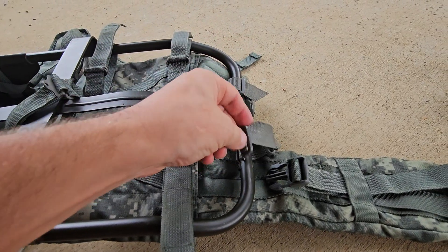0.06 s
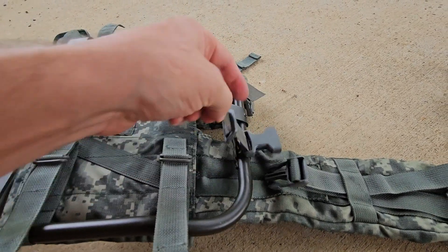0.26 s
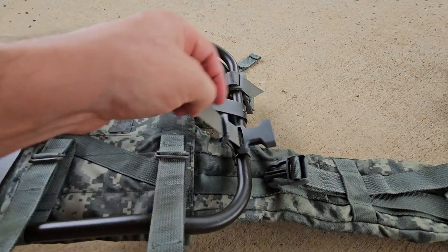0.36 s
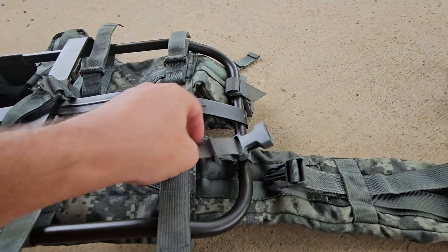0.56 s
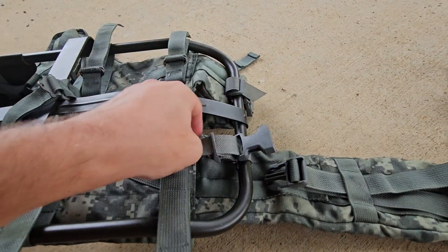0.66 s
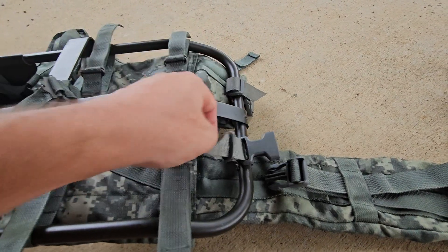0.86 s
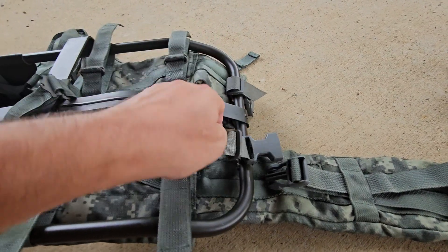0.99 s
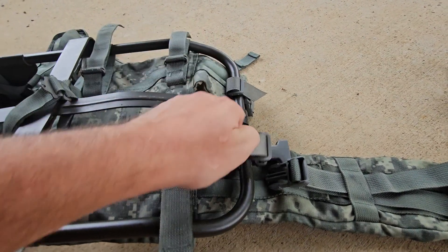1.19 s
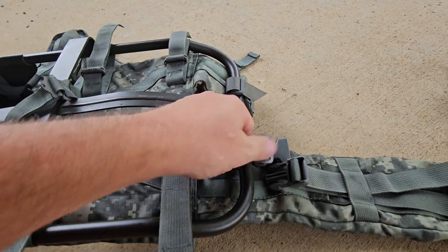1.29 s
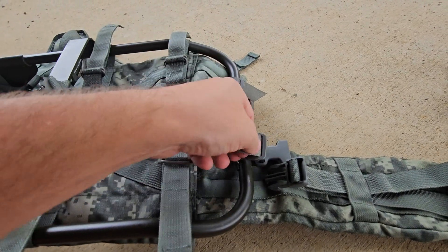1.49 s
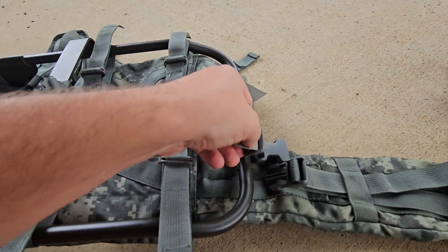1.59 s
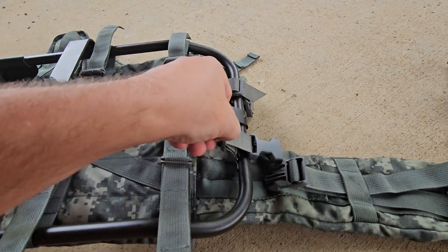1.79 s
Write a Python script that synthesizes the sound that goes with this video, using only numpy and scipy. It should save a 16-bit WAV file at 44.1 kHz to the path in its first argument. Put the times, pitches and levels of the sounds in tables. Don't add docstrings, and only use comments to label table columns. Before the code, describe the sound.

A plastic buckle on a webbing strap clacks loudly in a quick burst near the start, followed by dull frame knocks, fabric scuffs, softer clicks and a last small rattle, close-miked in a quiet room.

```python
import sys
import numpy as np
from scipy import signal
from scipy.fft import rfft, irfft, next_fast_len
from scipy.io import wavfile
from scipy.ndimage import uniform_filter1d

SR = 44100
rng = np.random.default_rng(int(sys.argv[2]) if len(sys.argv) > 2 else 0)


def bounce(signal):
    frames = np.transpose(np.atleast_2d(signal))
    limited = np.clip(frames, -1, 1)
    pcm = np.round(limited * 32767).astype(np.int16)
    wavfile.write(sys.argv[1], SR, pcm)


def how_loud(loudness_db):
    steps = np.asarray(loudness_db, float) / 20
    return 10 ** steps


N = 81585


def shape(x, gain):
    n = next_fast_len(x.shape[-1] + 2048)
    hz = np.arange(n // 2 + 1) * SR / n + 1e-3
    return irfft(rfft(x, n) * gain(hz), n)[..., :x.shape[-1]]


def curve(points):
    p = np.array(points)
    return lambda hz: how_loud(np.interp(np.log(hz), np.log(p[:, 0]), p[:, 1]))


def level(x, db):
    return x * how_loud(db) / np.sqrt(np.mean(x ** 2))


def walk(rate_hz):
    hold = int(SR / rate_hz)
    values = rng.standard_normal(N // 40)[:N // hold + 1]
    return uniform_filter1d(np.repeat(values, hold)[:N], hold)


def noise(apart, size=N):
    z = rng.standard_normal((3, size))
    return np.sqrt(1 - apart) * z[0] + np.sqrt(apart) * z[1:]


def add(out, start_s, sound):
    # time_s, left_over_right_db
    hand_side = [(0, -1.5), (.21, -1), (.3, -1), (.7, -4.5), (.89, 0), (1.1, -2.5), (1.7, -5), (1.82, 2)]
    i = int(start_s * SR)
    n = min(sound.shape[-1], N - i)
    pan_db = np.interp(start_s, *np.array(hand_side).T)
    sides = how_loud(np.array([[pan_db], [-pan_db]]) / 2)
    out[:, i:i + n] += (sound * sides)[:, :n]


def ring(t, hz, t60_s, rise_s, lead=0):
    caught_s = 0.022
    t = np.maximum(t, 0)
    fade = np.exp(-np.log(1000) * t / t60_s - (t / caught_s) ** 3)
    return np.sin(2 * np.pi * hz * t + lead) * fade * (1 - np.exp(-t / rise_s))


def off_pitch(hz, best_hz, octaves):
    return 1 - np.exp(-(np.log2(hz / best_hz) / octaves) ** 2)


def buckle_contacts(rows, top_hz):
    # pitch_hz, level_db, t60_s, left_lead_rad
    modes = [(2210, -10, 0.059, 1.4), (2420, -7, 0.12, 0.33), (2550, 8.5, 0.021, 0.3),
             (2975, 0.5, 0.086, 1.6), (3340, 0, 0.053, 1.4), (3700, -8, 0.038, 1.5),
             (3860, -10, 0.039, 2.5), (5560, -3, 0.038, 1.56), (6350, -16.5, .025, 4.3),
             (7340, 5, 0.033, 0.56), (8040, 8.5, 0.032, 1), (11150, -8.5, 0.014, 1.7),
             (12000, 1.5, .02, 1.8), (13700, -1, 0.025, 2.2)]
    focus_oct, focus_db, scatter_db = 0.04, 15, 3
    grip = 0.55
    rattle_db, rattle_t60_s = -9.5, 0.099
    skirt_db, skirt_oct, low_hz = 6, 0.88, 925
    body_db, body_width = -4, 0.017
    out, t = np.zeros((2, N)), np.arange(4000) / SR
    for start_s, db, best_hz, scrape_ms, ring_db in rows:
        luck = rng.standard_normal((len(modes), 2))
        ringing = 0
        for (hz, mode_db, t60_s, lead), (drive, detune) in zip(modes, luck):
            off = off_pitch(hz, best_hz, focus_oct)
            strength = how_loud(mode_db + (scatter_db * drive - focus_db) * off)
            leads = np.array([[lead], [0]])
            tone = ring(t, hz * (1 + 0.00041 * detune), t60_s * (1 - grip * off), scrape_ms / 4000, leads)
            ringing = ringing + strength * tone

        def skirt(f):
            off = off_pitch(f, min(best_hz * 1.09, 8000), skirt_oct)
            return how_loud(-skirt_db * off) / (1 + (low_hz / f) ** 3)

        def body(f):
            peaks = sum(how_loud(4 * detune - 4) / (1 + ((f / mode[0] - 1) / body_width) ** 2)
                        for mode, detune in zip(modes, luck[:, 1]))
            return 0.8 + how_loud(body_db) * peaks

        u = t * 1000 / scrape_ms
        scrape = np.exp(-u ** 2) + how_loud(rattle_db - 60 * t / rattle_t60_s)
        crack = noise(1, size=4000) * np.minimum(u * 4, 1) * scrape
        crack = shape(shape(crack, skirt), body)
        add(out, start_s, (ringing * how_loud(ring_db) + crack) * how_loud(db))
    return shape(out, lambda hz: 1 / (1 + (hz / top_hz) ** 6))


def snaps():
    # start_s, crack_db, best_driven_hz, scrape_ms, ring_over_crack_db
    hard_snaps = [(0.2111, -21.5, 2210, 3.2, -4.5), (.212, -29, 7730, 2.5, 6), (.250, -31, 8500, 1.5, 1),
                  (0.2703, -20, 2420, 1.96, 8), (.2706, -22, 3700, 2.3, -11),
                  (0.2848, -17.5, 7220, 5.3, -10), (.289, -22, 2420, 12, -2.5), (.2935, -26, 5570, 5.1, 12),
                  (0.353, -28.5, 4000, 3.5, -6.5), (1.104, -39.5, 12000, 5.7, -8),
                  (1.1095, -43, 7340, 2.2, -15.5), (1.117, -55, 12000, 1.4, -3.5),
                  (1.1244, -37.5, 5570, 3.7, 5.5), (1.1255, -42.5, 2420, 2, -7.5),
                  (1.805, -38, 13400, 4.8, -10)]
    return buckle_contacts(hard_snaps, top_hz=19100)


def taps():
    # start_s, crack_db, best_driven_hz, scrape_ms, ring_over_crack_db
    soft_taps = [(.027, -44.5, 3550, 2.6, -1), (.105, -52.5, 3330, 2.3, -3), (.152, -48, 2480, 2.3, -12),
                 (.217, -36, 2975, 15, 9.5), (.510, -51, 4100, 2.9, -3), (.524, -38, 3500, 2.5, -14),
                 (.558, -49, 2220, 0.96, -18), (.625, -52, 2710, 2.4, -26), (.686, -61.5, 5560, 3, 2),
                 (.751, -56.5, 6500, 3, -7.5), (.799, -57, 2210, 4.9, 9), (.806, -51, 4900, 2.1, -1),
                 (.8885, -37, 3090, 3.8, -20), (.894, -32, 2630, 1.34, -23), (1.228, -65, 2975, 13, -3),
                 (1.734, -50, 2210, 4, 7.5), (1.8125, -34.5, 3340, 7.6, -0.5),
                 (1.8245, -37, 5540, 2.7, -12), (1.829, -44, 5570, 4.7, 8.5), (1.817, -45, 2210, 12, 16),
                 (1.824, -40.5, 2935, 16, -1)]
    return buckle_contacts(soft_taps, top_hz=7300)


def pings():
    # start_s, level_db, pitch_hz, t60_s
    loose_parts = [(0.211, -26, 2990, .02), (.2125, -28, 2210, 0.015), (.2112, -33, 4970, 0.036),
                   (0.211, -43, 4190, .05), (.213, -42.5, 1537, 0.094), (0.216, -47.5, 143, 0.35),
                   (0.2715, -17, 2850, 0.015), (0.2713, -25, 3270, .014), (.2706, -17.5, 3590, 0.02),
                   (0.2711, -22, 5280, .014), (.2712, -30.5, 7450, .035), (0.272, -33.5, 8260, .022),
                   (0.271, -34.5, 13440, .015), (0.2832, -26, 7750, .03), (0.284, -27.5, 10720, .025),
                   (0.289, -31, 7870, .025), (.352, -45, 722, 0.022), (.3527, -35, 2920, 0.032),
                   (.353, -40, 4230, 0.022), (.354, -39, 5500, 0.017), (.5237, -48, 1350, 0.013),
                   (.524, -45, 7300, .015), (.5583, -47, 2180, 0.0096), (.5585, -48, 3900, .012),
                   (0.8886, -39.5, 3010, .02), (.8888, -41.5, 5500, 0.038), (0.8898, -45, 4090, .04),
                   (0.8904, -44, 6490, .045), (.892, -44, 2570, 0.068), (0.892, -45.5, 3250, 0.065),
                   (.892, -57.5, 1723, .08), (.892, -57.5, 604, .06), (1.1042, -39.5, 6460, 0.013),
                   (1.110, -46, 7300, .016), (1.1046, -39.5, 12300, .02), (1.1095, -49, 12600, .015),
                   (1.109, -49, 2670, 0.022), (1.1255, -38.5, 7800, 0.012), (1.685, -62.5, 628, 0.061),
                   (1.8134, -32.5, 5580, 0.032), (1.805, -43, 13000, .015), (1.233, -52, 3140, 0.032),
                   (1.125, -39, 2455, 0.035), (1.812, -38.5, 3700, .03), (1.817, -38, 3110, .03)]
    rise_s, lead_rad = 0.0004, 1.5
    out, t = np.zeros((2, N)), np.arange(3000) / SR
    for start_s, db, hz, t60_s in loose_parts:
        leads = lead_rad * min(hz / 2000, 1) * np.array([[1], [0]])
        add(out, start_s, how_loud(db) * ring(t, hz, t60_s, rise_s, leads))
    return out


def knocks():
    # start_s, level_db, pitch_hz, t60_s
    frame_knocks = [(.213, -39, 714, 0.054), (0.217, -44, 288, 0.21), (.271, -35.5, 777, 0.03),
                    (0.286, -37, 1157, 0.043), (.490, -53.5, 737, 0.12), (0.5238, -31.5, 730, 0.009),
                    (0.591, -33.5, 744, 0.0059), (.614, -42, 744, 0.013), (0.804, -52, 466, 0.051),
                    (0.895, -55, 1220, 0.081), (1.125, -38, 764, 0.043), (1.203, -45, 670, 0.019),
                    (1.233, -55.5, 755, 0.04), (1.735, -50, 793, 0.044), (1.820, -51, 755, 0.14)]
    right_lag_s, left_db = 0.00008, 2.5
    out, t = np.zeros((2, N)), np.arange(3000) / SR - np.array([[0], [right_lag_s]])
    for start_s, db, hz, t60_s in frame_knocks:
        tone = ring(t, hz, t60_s, 0.00053)
        tone = tone + how_loud(-5) * ring(t, hz * 1.6, t60_s * 0.31, 0.00031)
        grit = noise(0.16, size=3000) * how_loud(-60 * abs(t) / t60_s)
        grit = shape(grit, lambda f: 3 / (1 + (f / hz / 1.04) ** 2) / (1 + (hz * 0.99 / f) ** 6))
        add(out, start_s, (tone + grit) * how_loud(db + left_db * np.array([[1], [-1]])))
    return out


def strap():
    # start_s, length_s, level_db, tilt_db_per_octave
    strokes = [(0, 0.23, -61, -2.5), (0.182, 0.044, -51, -1.5), (0.204, 0.065, -41, -3),
               (0.271, 0.056, -45.5, -3.5), (0.317, 0.14, -49.5, -0.5), (0.478, 0.11, -52.5, -2),
               (0.589, 0.064, -54, 0), (0.66, 0.056, -59, 3.5), (0.744, 0.027, -61, 1.5),
               (0.782, 0.056, -60.5, -2), (0.898, .08, -59, 0.5), (1.058, 0.059, -62, 2),
               (1.123, 0.036, -71, -7), (1.198, 0.081, -63.5, -4), (1.283, 0.072, -61, 1),
               (1.381, 0.043, -62, -0.5), (1.441, 0.053, -63.5, 5.5), (1.579, 0.046, -54.5, 5.5),
               (1.661, 0.1, -63, 3), (1.783, 0.076, -54.5, -3)]
    rise_s, rise_share, edge, low_hz = 0.014, 0.4, 0.24, 500
    grain_db = 2 * walk(369.4) + 1.6 * walk(75)
    rasp = noise(1, size=N + SR) * np.tile(how_loud(grain_db), 2)[:N + SR]
    out = np.zeros((2, N))
    for start_s, length_s, db, tilt_db in strokes:
        u = np.arange(10000) / SR / length_s
        rise = u * max(length_s / rise_s, 1 / rise_share)
        fall = (1.2 - u) * 0.31 / edge
        swell = np.sin(np.pi / 2 * np.clip(np.minimum(rise, fall), 0, 1)) ** 2
        i = int(start_s * SR)
        stroke = shape(rasp[:, i:i + 10000] * swell,
                       lambda hz: how_loud(tilt_db * np.log2(hz / 5000)) / (1 + (low_hz / hz) ** 4))
        add(out, start_s, how_loud(db) * stroke)
    return out


def scuffs():
    # start_s, length_s, level_db, centre_hz
    bar_scuffs = [(0.624, 0.02, -61, 4300), (0.678, 0.017, -55, 5520), (0.671, .008, -56.5, 7000),
                  (0.749, 0.0081, -59, 7400), (.792, 0.022, -55.5, 2280), (0.801, .012, -58.5, 5000),
                  (1.787, 0.014, -59, 2730), (.5, .03, -55.5, 1370)]
    width = 0.11
    out, t = np.zeros((2, N)), np.arange(2000) / SR
    for start_s, length_s, db, hz in bar_scuffs:
        rub = shape(noise(0.84, size=2000), lambda f: 1 / (1 + ((f / hz - 1) / width) ** 2))
        add(out, start_s, level(rub, db) * np.sin(np.pi * np.minimum(t / length_s, 1)))
    return out


def port_shade(near):
    shade_db, shade_hz = 10, 11400
    sides = np.array([[-0.5], [0.5]])
    return shape(near, lambda hz: how_loud(sides * shade_db / (1 + (shade_hz / hz) ** 4)))


def room_tail(near):
    room_db, room_t60_s = -17, 0.25
    t = np.arange(20000) / SR
    tail = noise(0.3, size=20000) * np.exp(-np.log(1000) * t / room_t60_s) * np.minimum(t / 0.0067, 1)
    tail = tail / np.sqrt(np.sum(tail[0] ** 2))
    return how_loud(room_db) * signal.fftconvolve(near, tail, axes=1)[:, :N]


def room_floor():
    # pitch_hz, level_db_per_hz
    rumble_curve = [(15, -12.5), (25, -3.5), (60, -4.5), (120, -7), (200, -13.5), (290, -13.5), (350, -22),
                    (600, -25)]
    # centre_hz, width_hz, level_db
    hums = [(68.5, 4.9, -67.5), (235, 32, -66), (124, 37, -73.5)]

    def band(hz, width_hz):
        return lambda f: 1 / (1 + ((f - hz) / width_hz * 2) ** 2)

    rumble = shape(noise(0.054), lambda f: curve(rumble_curve)(f) / (1 + (f / 600) ** 4))
    rumble = level(rumble, -60)
    for hz, width_hz, db in hums:
        rumble = rumble + level(shape(noise(0.03), band(hz, width_hz)), db)
    rumble = rumble * how_loud(walk(6.7) + np.array([[0.6], [-0.6]]))
    whine = level(shape(noise(0.91), band(7500, 900)), -65.5)
    hiss = shape(noise(1.0), lambda f: how_loud(-1.5 * np.log2(f / 2000)) / (1 + (480 / f) ** 3))
    hiss = level(hiss, -65.5) * how_loud(4.3 * walk(8.18))
    return rumble + whine + hiss


def scene():
    near = snaps() + taps() + pings() + knocks() + strap() + scuffs()
    near = port_shade(near)
    return near + room_tail(near) + room_floor()


def top_cut(x):
    return signal.sosfilt(signal.butter(12, 16650, fs=SR, output="sos"), x)


def record(dry):
    # pitch_hz, gain_db
    mic = [(1000, 1.5), (5000, 2.5), (7600, 1), (8600, 0), (9600, -8), (11000, -2), (12500, 1.5),
           (15600, -6)]
    top_hz = 15950
    mix = shape(dry, lambda hz: curve(mic)(hz) / (1 + (hz / top_hz) ** 150))
    return top_cut(mix)


dry = scene()
out = record(dry)
bounce(out)
```